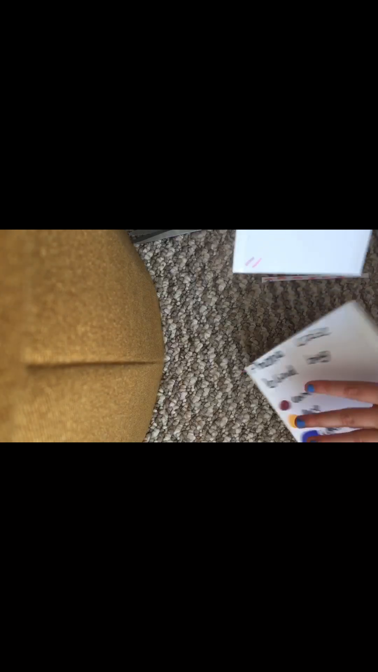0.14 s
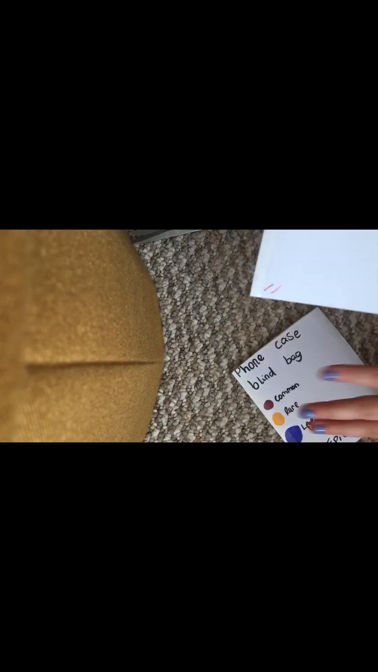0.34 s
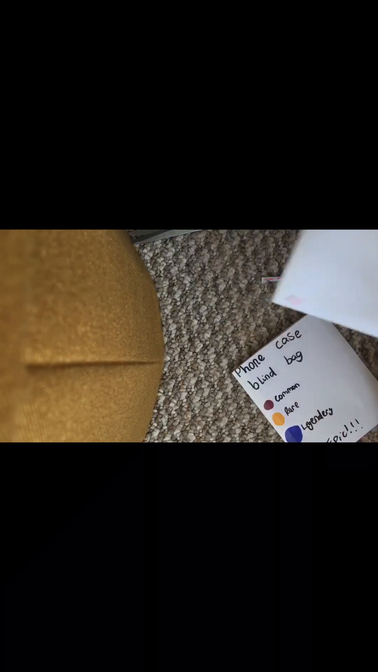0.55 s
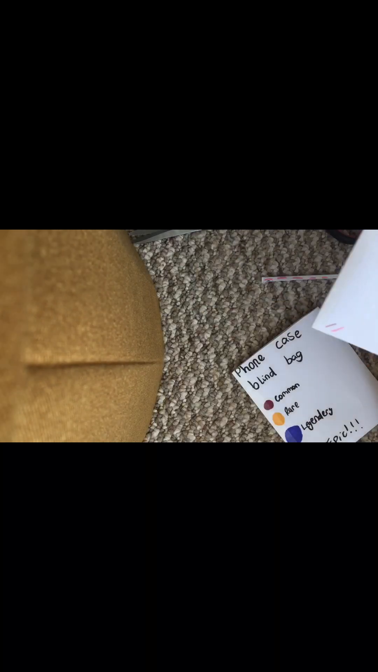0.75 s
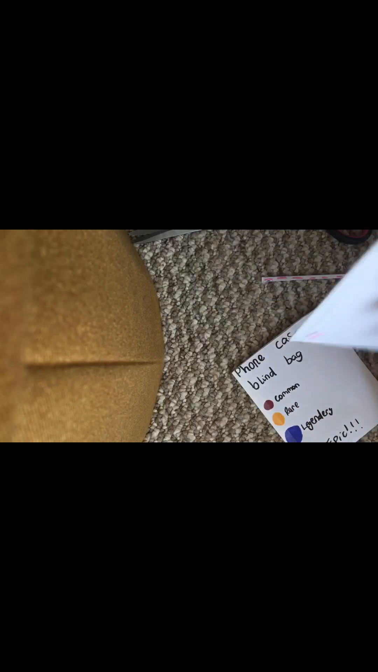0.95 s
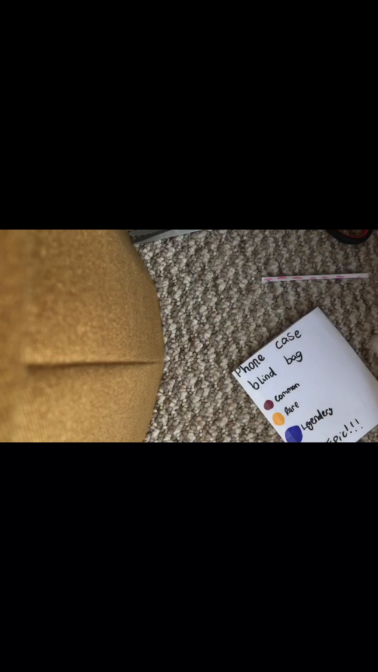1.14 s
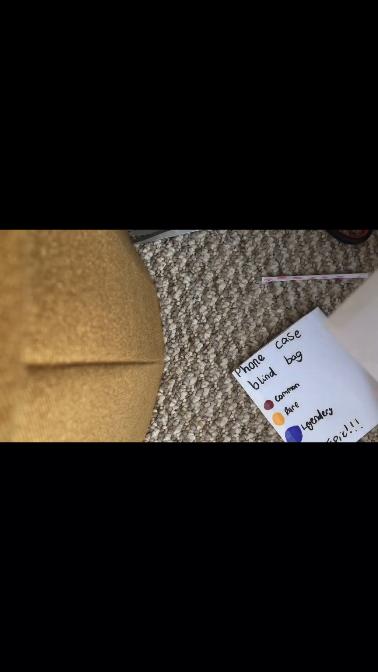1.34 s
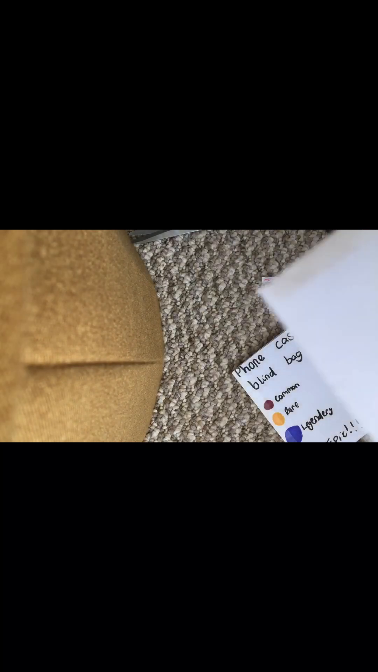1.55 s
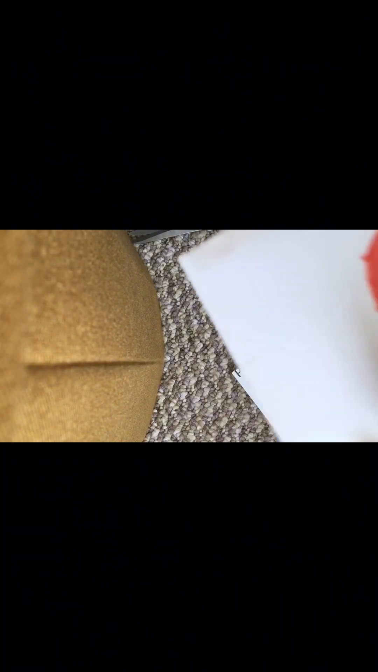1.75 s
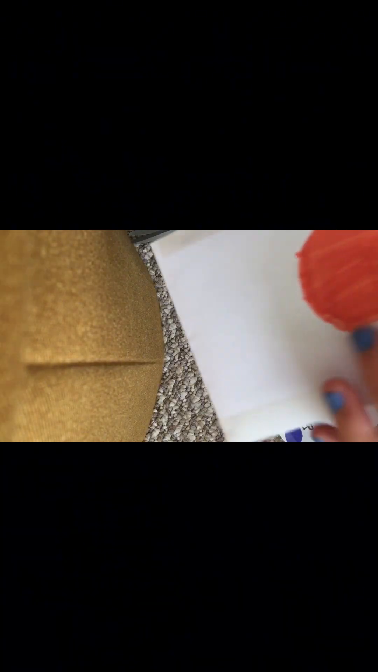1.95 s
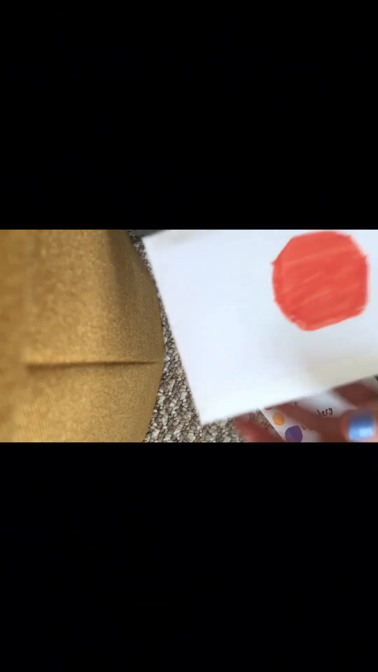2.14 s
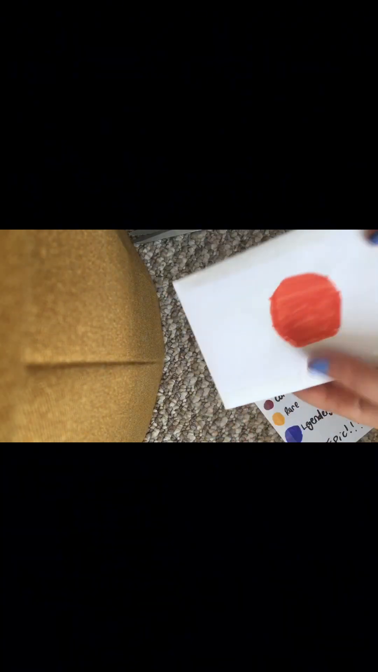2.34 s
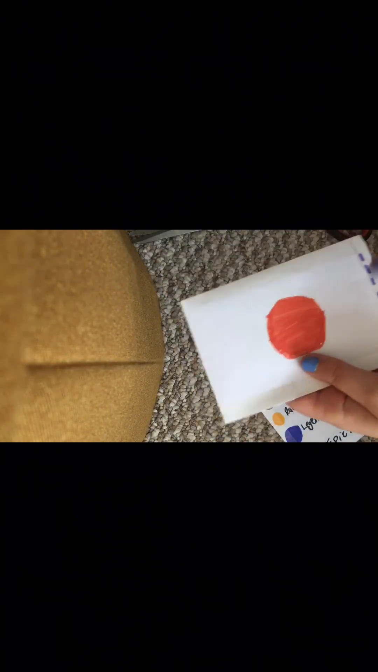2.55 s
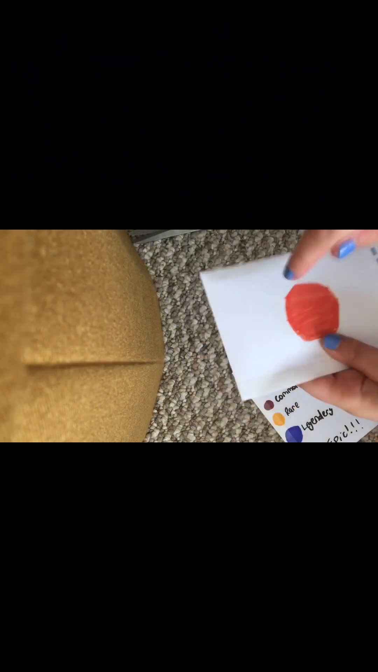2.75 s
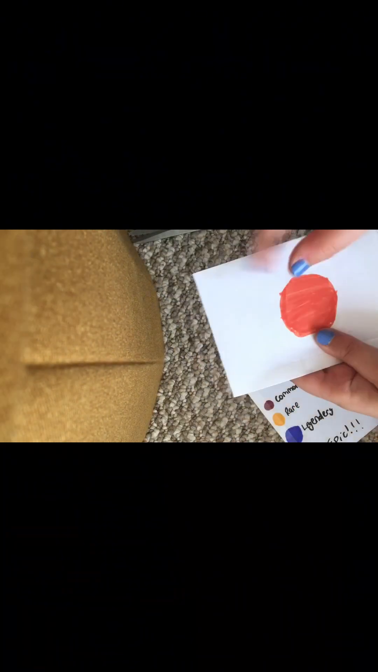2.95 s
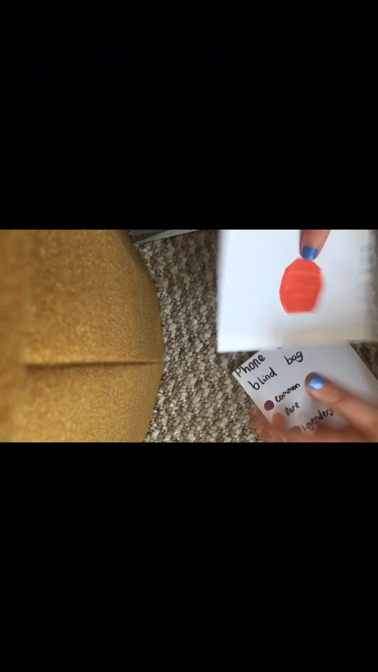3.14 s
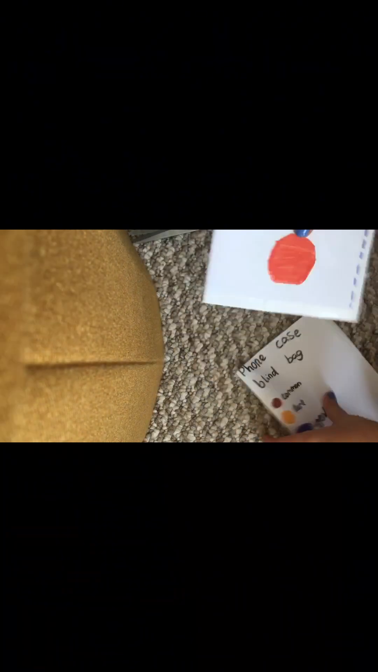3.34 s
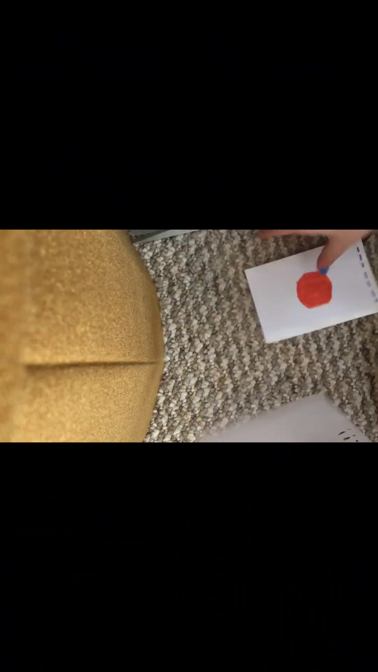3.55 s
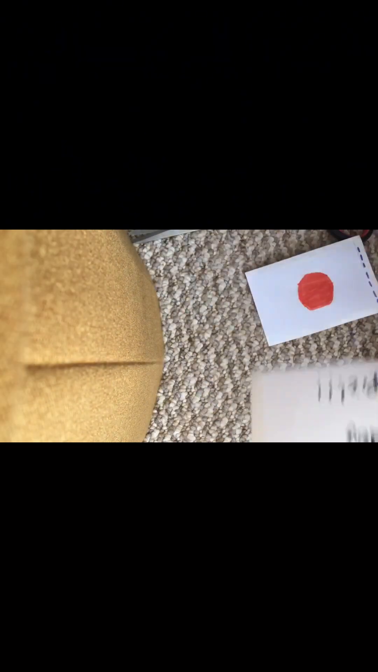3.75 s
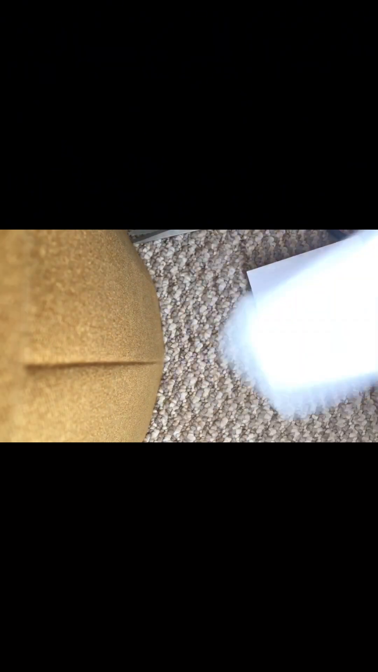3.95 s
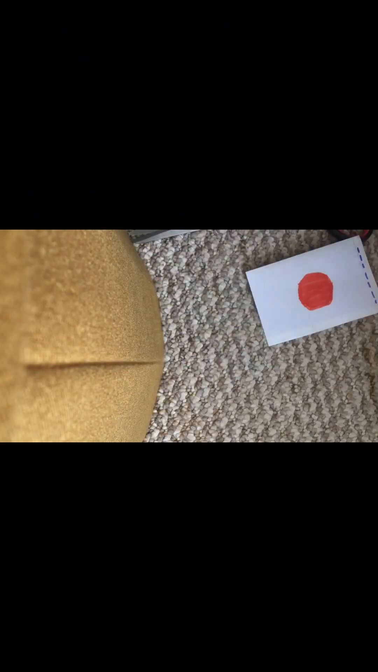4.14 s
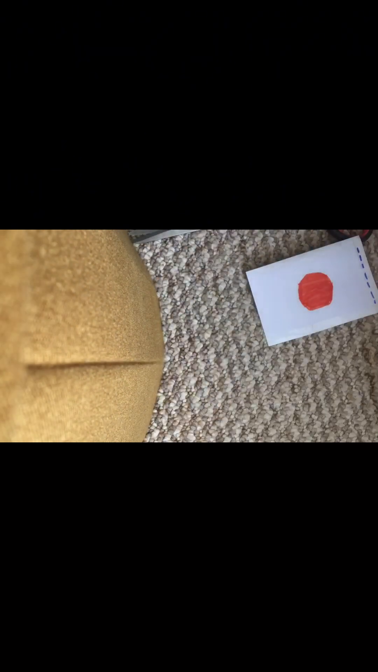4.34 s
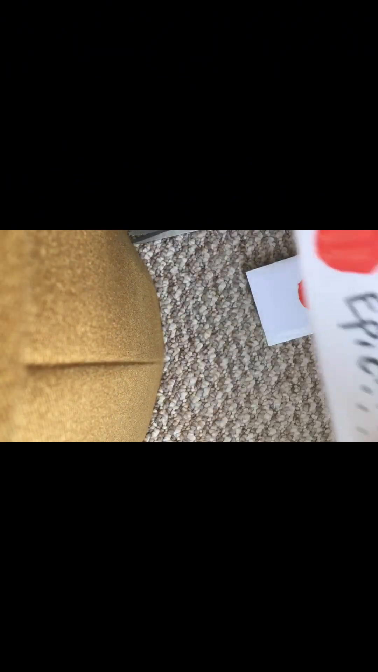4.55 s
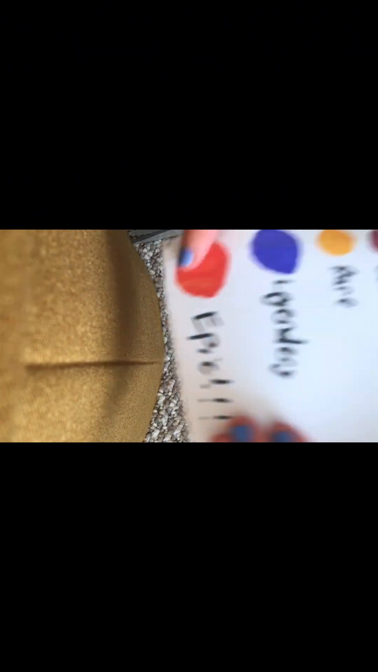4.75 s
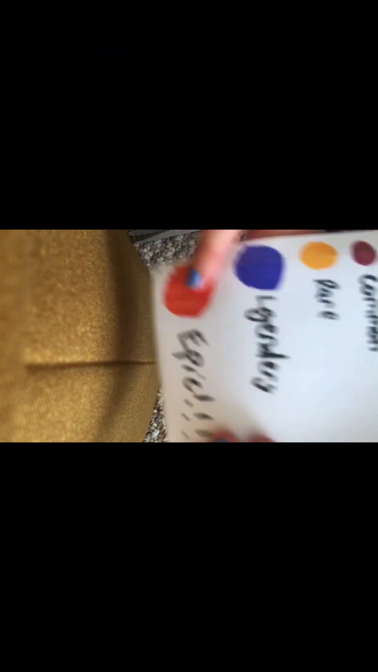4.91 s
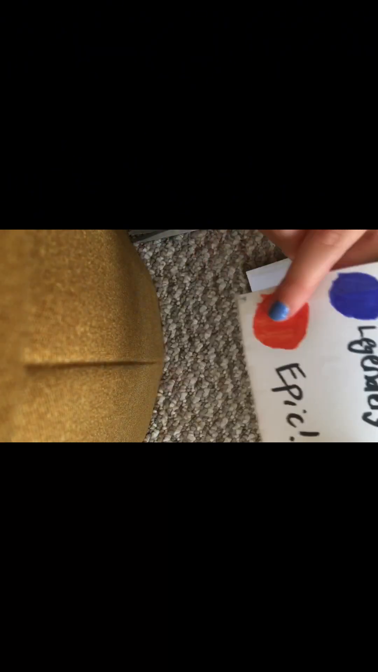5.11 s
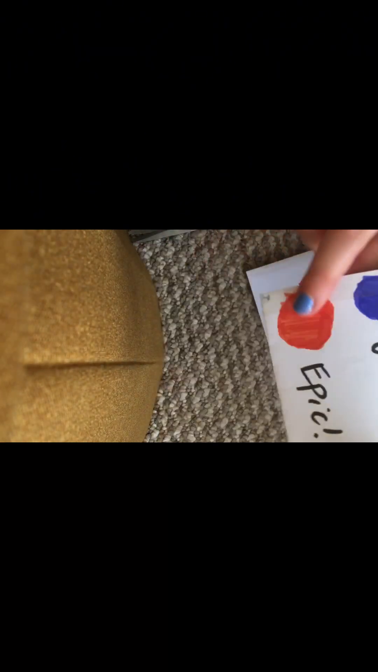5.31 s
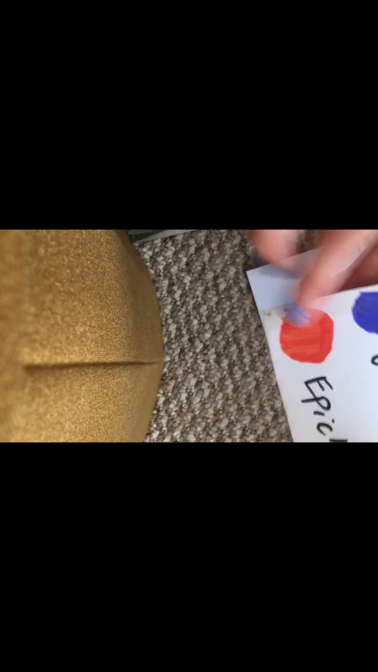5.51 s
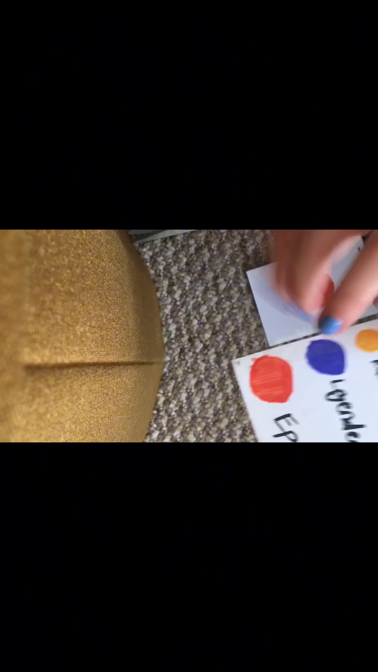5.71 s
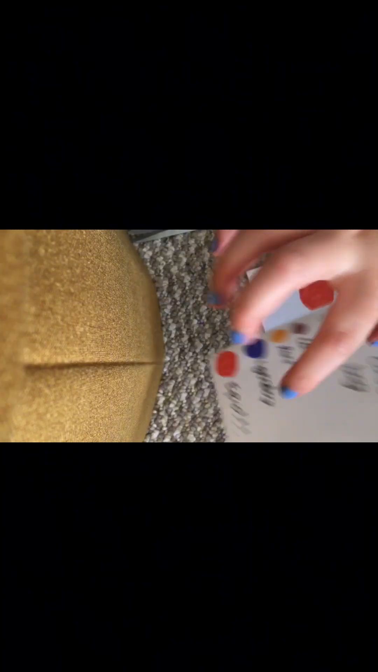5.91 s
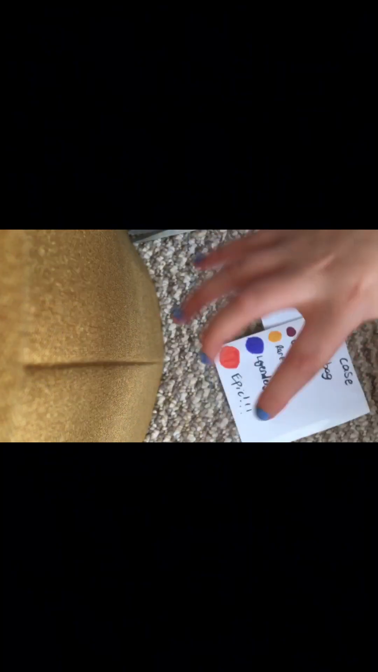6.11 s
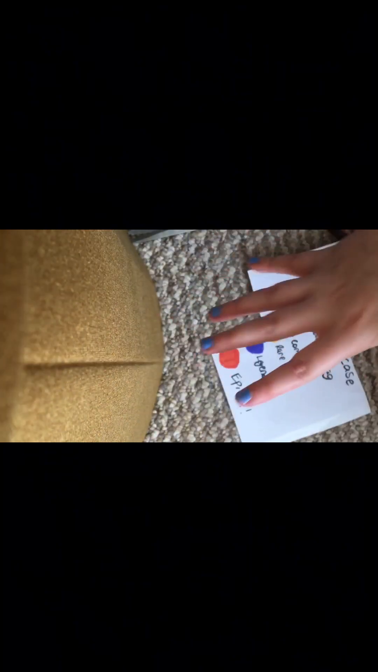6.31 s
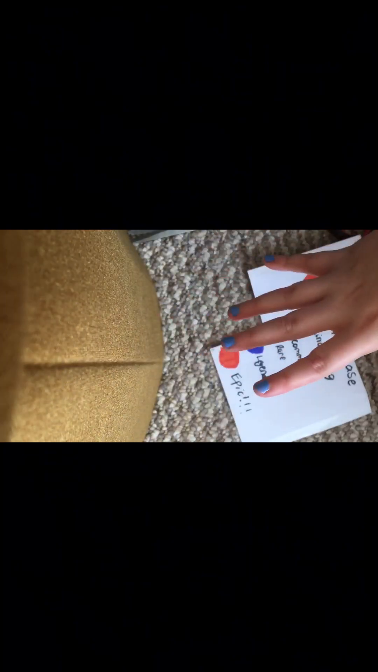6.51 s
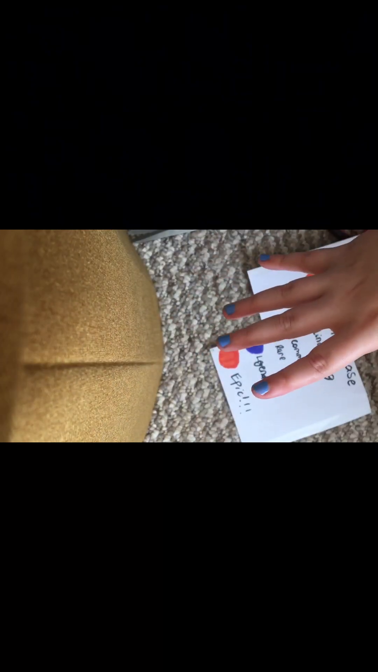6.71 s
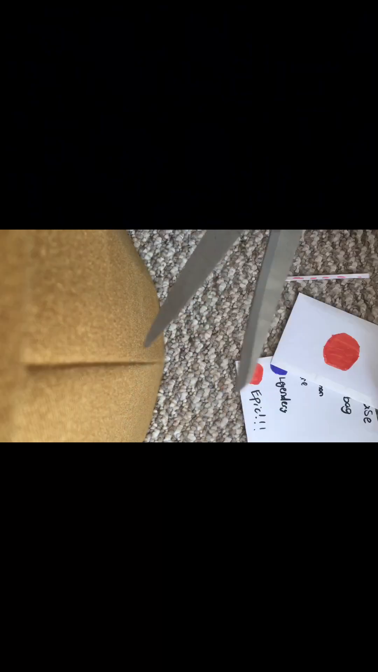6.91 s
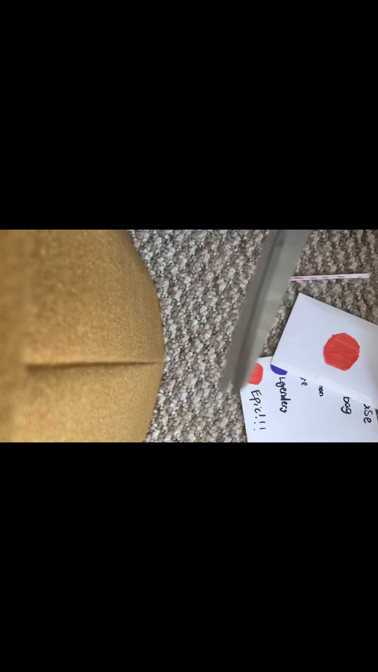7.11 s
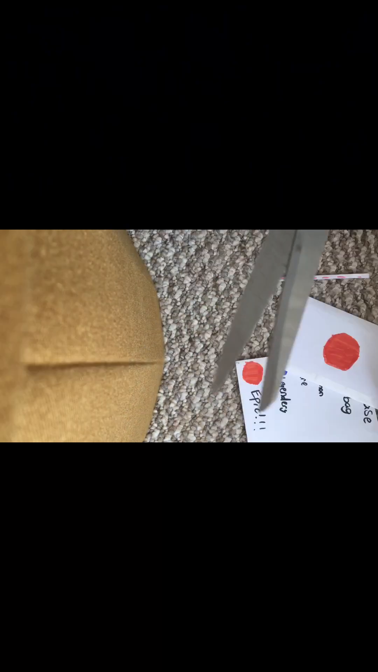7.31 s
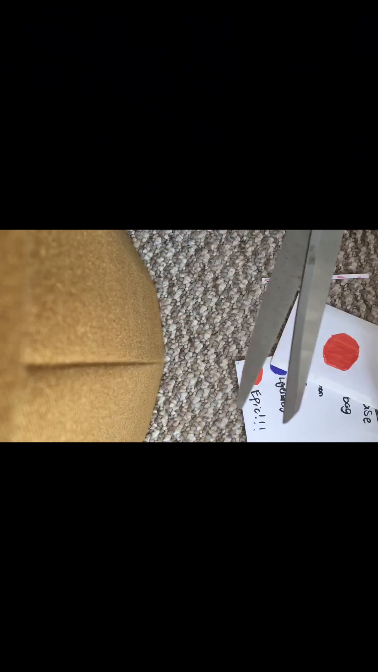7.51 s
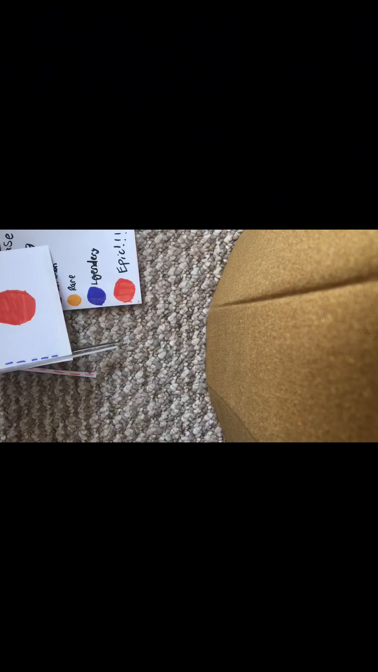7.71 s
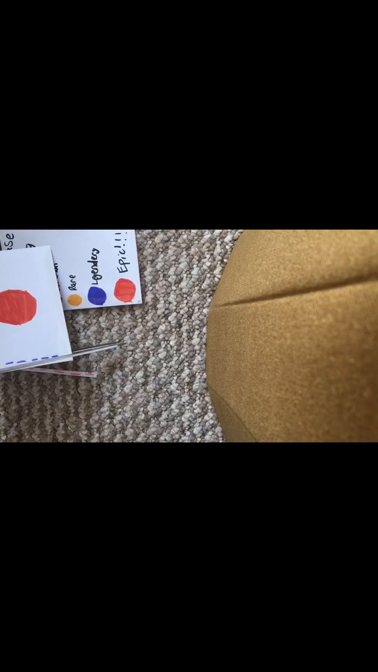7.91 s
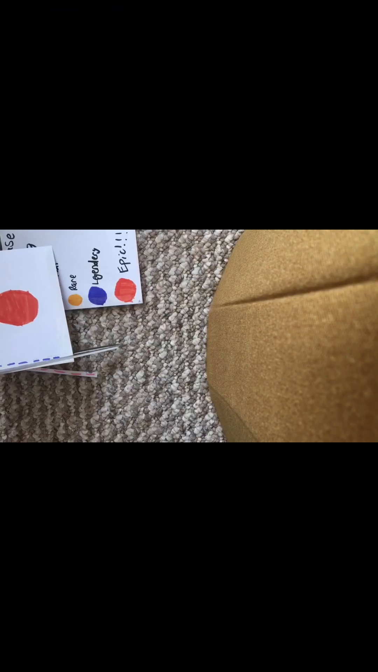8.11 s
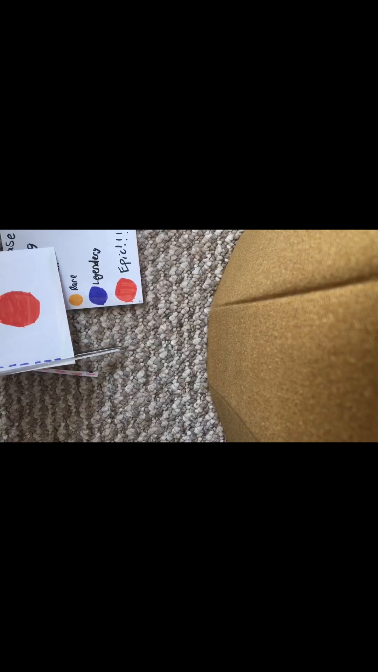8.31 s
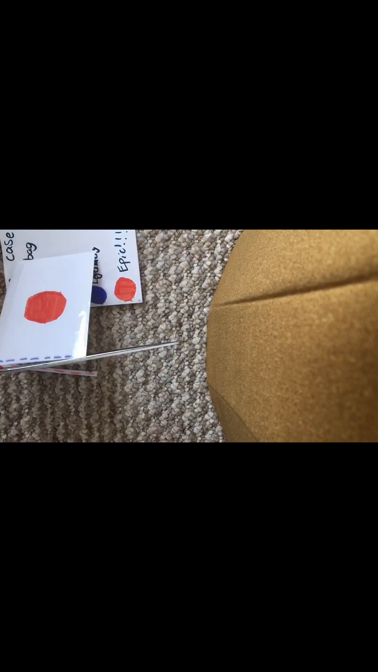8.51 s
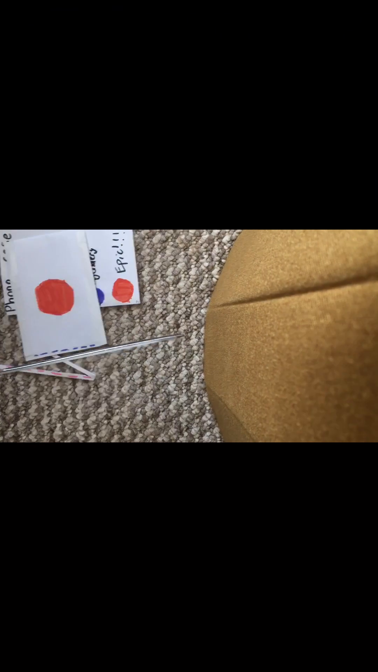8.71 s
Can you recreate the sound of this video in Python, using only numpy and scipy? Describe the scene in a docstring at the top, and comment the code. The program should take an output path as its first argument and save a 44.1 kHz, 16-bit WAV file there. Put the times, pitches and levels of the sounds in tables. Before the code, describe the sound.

Small bags of folded paper are handled close to the microphone in a quiet room with a faint, low motor hum. For the first two and a half seconds there are only light, scattered taps and crinkles. A sharp paper snap comes at about 2.6 seconds, and the handling grows busier, with crackles, short sliding rustles and soft low puffs of air, strongest around 4 seconds. Lighter taps and crinkles continue until about 6 seconds. Around 7 seconds scissors close twice in the air, with brief metallic chatter, a tiny squeal and a click. A short scrape follows near 7.7 seconds, then a few faint ticks and a slight low rumble. At 8.5 seconds the scissors snip through the paper with a sharp clack, the loudest sound, and the cut bag flops softly onto the carpet.

```python
"""A quiet furnished room, close over the carpet: hands turn, tap and slide small bags of folded paper.
Creases snap and ring the hollow of a bag, paper faces hiss and crinkle, swung bags pump the air.
Then scissors work twice in the air and snip through a bag: the blades chatter, squeal and clack, the
room rumbles briefly and the cut bag flops down. A far motor hums behind; a phone microphone hears it."""
import sys
import numpy as np
from scipy import signal
from scipy.fft import rfft, irfft, next_fast_len
from scipy.io import wavfile
from scipy.ndimage import uniform_filter1d, map_coordinates

SR = 44100
rng = np.random.default_rng(int(sys.argv[2]) if len(sys.argv) > 2 else 0)


def generate_wav(sig):
    """Save sig (samples, or channels by samples) to the path in sys.argv[1] as 16-bit PCM at SR."""
    pcm = np.round(np.clip(np.atleast_2d(sig).T, -1, 1) * 32767).astype(np.int16)
    wavfile.write(sys.argv[1], SR, pcm)


N = 390726

# creases buckling and fingertips landing: t/s, sheet peak/dB, crack re sheet/dB, puff re sheet/dB
PAPER_SNAPS = [(0.0524, -45.5, -6.5, -13), (0.0679, -38.5, -19, -28), (0.0923, -58.5, 6.5, -18),
               (0.1889, -27.5, -33, -24), (0.2474, -57, 9, 1), (0.632, -46.5, 5.5, 0),
               (0.6382, -36.5, 4.5, -4.5), (0.6515, -40, -25, -6), (0.6716, -33.5, 3, -9),
               (0.6919, -33, 7, -8.5), (0.7061, -34.5, 1.5, -11), (0.8468, -44, -2.5, -1),
               (0.8683, -44, -19, -2.5), (0.8842, -60, 10, 4), (1.0, -64, -15, 9), (1.045, -67.5, -15, 8),
               (1.261, -52, 1, -1.5), (1.3574, -54.5, -5, -0.5), (1.3968, -53.5, 8, 0.5),
               (1.496, -52.5, -3, -2), (1.545, -67.5, -15, 13), (1.581, -60.5, 8, 0),
               (1.703, -54.5, -4, 5.5), (1.8584, -46.5, -32, 3), (1.922, -60.5, -10, 11.5),
               (1.99, -52, -12, -15), (2.0386, -48, -9, -20), (2.075, -63, -8, 6), (2.302, -56.5, -1, -2),
               (2.331, -57, 6, -2), (2.338, -38.5, -10, -8), (2.3544, -40, -10, -2),
               (2.4257, -49.5, 8.5, 0.5), (2.4691, -39, -21, -10), (2.6059, -10, -6.5, -10),
               (2.6153, -23, -22, -18), (2.6847, -57.5, 22, 5), (2.7933, -28, -10, -2),
               (2.813, -48, -9, -7), (2.826, -46, -2, -11), (2.9949, -30.5, -6.5, -5),
               (3.0316, -36.5, -3.5, -23), (3.0476, -41, -3, -2), (3.0529, -39, 5.5, -5.5),
               (3.0793, -36.5, -5, -7), (3.1052, -48, -10, -15), (3.137, -54, -2, -8),
               (3.199, -45, 3.5, -9), (3.2508, -42.5, -3, -6), (3.2612, -31, -23, -25),
               (3.3056, -32, -4, -24), (3.3336, -26.5, -7, -15), (3.3452, -30, 1.5, -7.5),
               (3.45, -36.5, -14, -15), (3.4654, -36, -18, -7), (3.5062, -33.5, -16, -18),
               (3.522, -37, 0, -4.5), (3.633, -44.5, 1, -11), (3.6786, -48, -3.5, -3),
               (3.7154, -29.5, -1.5, 0), (3.732, -22, -6.5, -14), (3.7766, -44.5, -6, 7.5),
               (3.8403, -35.5, -16, -8), (3.9232, -27, -1, -15), (3.9448, -35, -1, -2),
               (3.9549, -35, -22, -6), (4.0392, -32, -11, 1.5), (4.0782, -19, 2, -16),
               (4.084, -23.5, 1, -10), (4.1838, -40, -11, 3), (4.2257, -19, -9, -6.5), (4.24, -25, -9, -9),
               (4.2481, -27, -7, -0.5), (4.2808, -31.5, -6.5, -7), (4.3043, -27.5, -25, -5),
               (4.325, -43, -30, -2), (4.3427, -53, 5, 9.5), (4.3673, -44, -33, 1),
               (4.3848, -38, -6.5, -2.5), (4.5667, -37, -2.5, -3), (4.5745, -46.5, -2, -9.5),
               (4.6253, -45, -4, -7), (4.673, -37, -32, -5), (4.7146, -45, -3.5, -3),
               (4.7644, -37.5, -8, -5.5), (4.8305, -54, -20, -19), (4.8746, -35, -10, -2),
               (4.8885, -36, 3.5, -8.5), (4.9409, -49, 6.5, 7.5), (5.0492, -36.5, -9.5, -5),
               (5.056, -37, -11, -10), (5.0658, -42, -0.5, 0.5), (5.1058, -42.5, -1.5, -7),
               (5.134, -46, -4, -5), (5.2034, -41.5, -4.5, -4), (5.2906, -43, -11.5, -4.5),
               (5.3059, -41.5, -2.5, -8.5), (5.37, -44.5, -15, -5), (5.4206, -29.5, -27, -4),
               (5.4538, -45, -10, 1), (5.4866, -36, -6.5, -11), (5.6015, -48.5, -5, -13),
               (5.6228, -46.5, 4, -13.5), (5.6628, -63.5, 24.5, 7), (5.724, -35, -4.5, -9),
               (5.7342, -48, 3, -15), (5.7481, -44, -28, -6), (5.768, -46.5, 1.5, -8),
               (5.7929, -52, 6.5, -4), (5.9545, -40.5, 3, -5.5), (5.9752, -41, -24, -15),
               (6.259, -61.5, 9, -9.5)]
# tone of the sheet's body, a crease's bright crack and a bag's puff of air: f/Hz, level/dB
SHEET_EQ = [(300, -25), (600, 2), (900, 0), (1400, -1.5), (2500, -7), (4000, -10), (7000, -26)]
CRACK_EQ = [(2500, -22), (4500, -0.5), (6500, 0), (13000, -6.5), (16800, -14)]
PUFF_EQ = [(60, -25.5), (110, 0.5), (250, 1.5), (520, -6.5), (850, -21.5)]


def snaps():
    """A buckling crease cracks, rings the bag's hollow a little longer and pushes out a puff of air."""
    # pitch of the hollow as the grip opens and closes it: t/s, f/Hz
    hollow_pitch = [(0, 2100), (.3, 2000), (.6, 1450), (2.3, 1250), (2.6, 1600), (3.1, 1300), (3.33, 2200),
                    (3.5, 1300), (3.92, 1800), (4.3, 1150), (4.9, 1500), (6.3, 1200)]
    at, db, crack_db, puff_db = np.transpose(PAPER_SNAPS)[:, :, None]
    detune = np.exp(0.23 * rng.standard_normal(db.shape))
    hollow_hz = np.interp(at, *np.transpose(hollow_pitch)) * detune
    t = np.arange(SR // 20) / SR
    # strong snaps run along more folds, so they last longer
    life = 0.0039 * amp(0.025 * (db + 38.0) + 1.4 * rng.standard_normal(db.shape))
    attack = 1 - np.exp(-t / 0.000075)

    def burst(decay_s, grit_db):
        return gritty((len(at), len(t)), grit_db) * attack * np.exp(-(t / decay_s) ** 1.4)

    hollow = modes([(hollow_hz, 0.83 * hollow_hz, 0), (3.0 * hollow_hz, 0.52 * hollow_hz, -9)])
    crack = filtered(burst(0.43 * life, 3.3), colour(CRACK_EQ))
    sheet = filtered(burst(0.61 * life, 1.6), lambda hz: (hollow(hz) + 0.12) * colour(SHEET_EQ)(hz))
    pocket_hz = 260 * np.exp(0.35 * rng.standard_normal(db.shape))  # each fold traps its own air pocket
    pocket = modes([(pocket_hz, 0.73 * pocket_hz, 0)])
    puff = filtered(burst(1.4 * life, 0.8), lambda hz: (pocket(hz) + 0.2) * colour(PUFF_EQ)(hz))
    snap = peaked(sheet) + amp(crack_db) * peaked(crack) + amp(puff_db) * peaked(puff)
    return placed(at[:, 0], amp(db) * snap)


def rubbing():
    """Fibres hiss in each rub and around each snap; the sheets crinkle in clumps, pop and puff."""
    # paper rubs; the last row is a faint rise in background hiss with ticks:
    # start/s, end/s, hiss/dB, crinkle/dB, swell/dB
    rubs = [(0.043, 0.104, -79, -71, -4), (0.173, 0.26, -79, -66.5, -8), (0.33, 0.396, -76.5, -88, -3),
            (0.631, 0.71, -83, -67, 4), (0.712, 0.75, -64, -67, 2), (0.75, 0.826, -71.5, -78.5, 0),
            (0.829, 0.9, -75, -76, -12), (0.934, 0.998, -71.5, -86, -3), (1.12, 1.184, -72, -72.5, 3.5),
            (1.223, 1.276, -74.5, -70, -3), (1.334, 1.446, -71.5, -73, -4.5), (1.5, 1.58, -73, -78.5, 0),
            (1.913, 1.98, -65, -67, 2.5), (1.982, 2.07, -68, -64, -6), (2.303, 2.439, -71, -64.5, 4.5),
            (2.443, 2.472, -62.5, -65.5, 1), (2.585, 2.598, -82, -67, 3), (2.604, 2.624, -48.5, -40, -2.5),
            (2.626, 2.68, -60, -61, -4), (2.828, 2.871, -61.5, -66, 2), (2.96, 3.098, -59, -57.5, 6.5),
            (3.191, 3.257, -69.5, -65, 2), (3.255, 3.323, -55, -48, 0.5), (3.33, 3.359, -52, -45, 4.5),
            (3.355, 3.535, -61.5, -56.5, -1), (3.537, 3.6, -66, -65.5, -2.5), (3.6, 3.651, -52.5, -58, 0.5),
            (3.647, 3.714, -71, -66, 0), (3.717, 3.756, -53, -41, -1), (3.758, 3.827, -64.5, -58.5, 2),
            (3.83, 3.931, -47.5, -50, 10), (3.932, 3.965, -58, -49.5, 1.5), (3.967, 4.02, -75, -60.5, 5),
            (4.022, 4.091, -40, -35, 17.5), (4.095, 4.164, -73.5, -72, -15), (4.172, 4.226, -62.5, -64, -6),
            (4.229, 4.4, -89.5, -68.5, -22.5), (4.762, 4.815, -71.5, -68, 5), (4.88, 4.956, -87, -71.5, 0),
            (5.364, 5.496, -90, -70.5, 2), (5.601, 5.803, -77.5, -70, 4), (6.016, 6.056, -61, -62.5, -3),
            (7.68, 8.2, -84.5, -86.5, 0.5)]
    # tone of the hiss: f/Hz, level/dB
    hiss_eq = [(3000, -25), (4500, -5.5), (6500, -1), (11000, -4), (16800, -12)]
    hiss_gain, crinkle_gain = stroke_gains(rubs, edge_s=0.0067)
    at, db, crack_db, _ = np.transpose(PAPER_SNAPS)[:, :, None]
    lead = SR // 60
    t = np.arange(-lead, 3 * lead) / SR
    rustle = np.where(t < 0, np.exp(t / 0.002), np.exp(-(t / 0.013) ** 2))  # build-up, then tail
    starts = at[:, 0] - lead / SR
    hiss_gain += placed(starts, amp(db + crack_db - 34) * rustle)
    crinkle_gain += placed(starts, amp(db - 26) * rustle)

    def grain(grit_db, eq, depth_db):
        slips = unit(gritty(N, grit_db))
        creases = amp(-7) * pops(count=600)
        return patchy(filtered(slips + creases, colour(eq)), depth_db)

    clumps = wobble(60)
    fibres = amp(1.7 * clumps + 0.78 * wobble(230)) * grain(3.9, hiss_eq, depth_db=2.5)
    folds = amp(1.7 * clumps + 2.4 * wobble(150)) * grain(5.0, SHEET_EQ, depth_db=5)
    puffs = amp(-4 + 2.2 * wobble(25)) * unit(filtered(rng.standard_normal(N), colour(PUFF_EQ)))
    return hiss_gain * unit(fibres) + crinkle_gain * (unit(folds) + puffs)


def scissors():
    """Edges chatter along each other and ring the blades, scrape, clack and squeal."""
    # blade strokes: start/s, end/s, chatter/dB, scrape/dB, swell/dB
    blade_strokes = [(6.826, 6.866, -60, -65.5, 9.5), (6.937, 6.959, -49.5, -57, 10.5),
                     (6.962, 6.992, -33, -46.5, 18.5), (7.155, 7.173, -43.5, -56.5, 16.5),
                     (7.178, 7.187, -57, -54, 6.5), (7.657, 7.671, -58, -37, 8),
                     (8.424, 8.486, -90, -64.5, 2), (8.486, 8.499, -61.5, -40.5, 15.5),
                     (8.5, 8.509, -33, -39.5, 0.5), (8.51, 8.624, -79.5, -60.5, -11.5),
                     (8.639, 8.72, -77, -64.5, -5.5)]
    # resonances of the steel: f/Hz, width/Hz, level/dB
    blade_modes = [(2160, 280, -16), (3670, 160, -11), (4300, 300, -19), (5820, 300, -17), (8300, 180, -12),
                   (9600, 420, -8), (11200, 250, -4), (13900, 400, -6), (14530, 270, -0.5),
                   (14370, 540, -7)]
    chatter_gain, scrape_gain = stroke_gains(blade_strokes, edge_s=0.0037)
    chatter = chatter_gain * unit(amp(4.5 * wobble(600)) * gritty(N, 6.5))
    ring = modes(blade_modes)
    steel = filtered(chatter, ring) / np.std(filtered(rng.standard_normal(SR), ring))
    return steel + shearing(scrape_gain) + clacks(ring) + squeals()


def shearing(gain):
    """Closing edges scrape along each other: a broad, grainy rasp."""
    # tone of the rasp: f/Hz, level/dB
    shear_eq = [(240, -18), (400, -16.5), (1030, -1.5), (2290, -4), (2930, -9.5), (6390, -5),
                (14800, -14.5), (16500, -21)]
    flutter = amp(1.2 * wobble(360))
    rasp = patchy(filtered(gritty(N, 3), colour(shear_eq)), depth_db=4.0)
    return gain * flutter * unit(rasp)


def clacks(blade_ring):
    """Tips and handles meet: each blow blends ringing steel with a dull knock."""
    # blows: t/s, level/dB, dull share from 0 to 1
    hits = [(6.8265, -52.5, .2), (6.9927, -30.5, 0.7), (7.186, -31, 0), (7.6635, -55.5, 0.7),
            (7.85, -55, 0.43), (8.018, -54, 0.68), (8.426, -58.5, .7), (8.4965, -17.5, 0.55),
            (8.5071, -5, 0.58), (8.508, -11.5, 0.37), (8.6399, -59.5, 0.6)]
    at, db, dull = np.transpose(hits)[:, :, None]
    t = np.arange(SR // 20) / SR
    blow = rng.standard_normal((len(at), len(t))) * np.exp(-t / 0.0014)
    handles = peaked(filtered(blow, modes([(1782, 370, -3.0), (4150, 1000, 5.5), (5560, 1500, 7.5)])))
    tips = peaked(filtered(blow, blade_ring))
    return placed(at[:, 0], amp(db) * ((1 - dull) * tips + dull * handles))


def squeals():
    """The blades squeal as their crossing point runs along them."""
    # gliding chirps: t/s, length/s, start f/Hz, end f/Hz, level/dB
    chirps = [(6.974, 0.0091, 7600, 10970, -36), (6.982, 0.007, 11800, 12090, -27.5),
              (6.983, .006, 13600, 14820, -30), (7.165, 0.014, 13800, 12400, -38),
              (7.181, 0.0132, 9800, 8000, -50), (8.502, .006, 7800, 9810, -21.5)]
    at, length, start_hz, end_hz, db = np.transpose(chirps)[:, :, None]
    t = np.arange(SR // 20) / SR
    progress = np.clip(t / length, 0, 1)
    pitch = start_hz + (end_hz - start_hz) * progress
    tone = np.sin(2 * np.pi * np.cumsum(pitch, axis=1) / SR)
    flutter = amp(4 * unit(uniform_filter1d(rng.standard_normal(progress.shape), size=12)))
    return placed(at[:, 0], amp(db) * np.sin(np.pi * progress) * flutter * tone)


def drops():
    """The cut bag flops onto the carpet with only a soft puff of air."""
    # landings: t/s, peak/dB
    flops = [(8.506, -45.5), (8.662, -39.5), (8.685, -47)]
    at, db = np.transpose(flops)[:, :, None]
    t = np.arange(SR // 10) / SR
    push = rng.standard_normal((len(at), len(t))) * t * np.exp(-t / 0.004)
    return placed(at[:, 0], amp(db) * peaked(filtered(push, colour(PUFF_EQ))))


def low_swells():
    """Low swells of air: bags swung nearby, then room rumble during the scissors."""
    # middle t/s, half length/s, level/dB
    swells = [(0.681, 0.094, -57), (1.816, 0.09, -52.5), (2.37, 0.048, -51), (2.617, 0.044, -50),
              (2.998, 0.046, -52), (3.077, .066, -52.5), (3.743, 0.076, -42.5), (3.958, 0.04, -46),
              (4.056, 0.044, -39), (4.245, 0.046, -38.5), (4.409, 0.14, -55.5), (4.714, 0.077, -53),
              (4.781, 0.047, -52), (4.895, 0.0397, -46.5), (4.97, .065, -55.5), (5.075, 0.063, -52.5),
              (5.255, 0.13, -57), (8.109, .04, -59.5), (8.248, 0.042, -56), (8.539, 0.14, -58.5)]
    # tone of the swells: f/Hz, level/dB
    air_eq = [(40, -31), (65, 6.5), (110, -5.5), (150, -11), (250, -31)]
    at, half_length, db = np.transpose(swells)[:, :, None]
    t = np.arange(SR // 3) / SR
    air = filtered(rng.standard_normal((len(at), 2 * len(t))), colour(air_eq))[:, len(t):]
    swell = air * np.sin(np.pi * np.clip(t / (2 * half_length), 0, 1)) ** 2.1
    size = np.sqrt((swell ** 2).sum(axis=1, keepdims=True) / (half_length * SR))
    return placed((at - half_length)[:, 0], amp(db) * swell / size)


def ticks():
    """Folded paper settles with faint scattered ticks."""
    return amp(-91.5) * filtered(pops(count=150), colour(CRACK_EQ))


def walls(x):
    """A short room reverb, with a fresh tail every quarter second as moving hands change the paths."""
    # time the room takes to die by 60 dB: f/Hz, decay/s
    decay_times = [(150, 0.11), (3000, 0.16), (15000, 0.06)]
    reverb, step = np.zeros(N + SR), SR // 4
    predelay = 200  # samples
    for i in range(0, N, step):
        hz, t, bands = signal.stft(rng.standard_normal(SR // 3), SR, nperseg=256)
        decay = amp(-60 * t / along(decay_times, hz)[:, None])
        tail = signal.istft(bands * decay, SR, nperseg=256)[1]
        wet = signal.fftconvolve(x[i:i + step], tail / np.linalg.norm(tail))
        reverb[i + predelay:][:len(wet)] += wet
    return reverb[:N]


def room_tone():
    """A bed of air and microphone hiss over the wavering drone of a far motor."""
    # tone of the bed: f/Hz, level/dB
    bed_eq = [(40, -21), (60, -0.5), (100, -6.5), (190, -14.5), (400, -20), (830, -27), (1400, -29.5),
              (9000, -37.5), (16800, -43.5)]
    # motor hum: multiple of the turning speed, level/dB
    harmonics = [(2, -62.5), (3, -67), (4, -71)]
    bed_gain = amp(-68.5 + 0.94 * wobble(2))
    bed = unit(filtered(rng.standard_normal(N), lambda hz: amp(along(bed_eq, hz, -90))))
    motor_hz = 21.4 + 0.56 * wobble(3.5)
    turn = 2 * np.pi * np.cumsum(motor_hz) / SR
    drone = sum(amp(db + 2.5 * wobble(5)) * np.sin(k * turn + 0.6 * wobble(3)) for k, db in harmonics)
    return bed_gain * bed + drone


def amp(db):
    """Decibels to gain."""
    return 10 ** (np.asarray(db) / 20)


def unit(x):
    """Scaled to rms 1."""
    return x / np.sqrt(np.mean(x ** 2) + 1e-20)


def peaked(rows):
    """Every row scaled to peak 1."""
    return rows / np.abs(rows).max(axis=-1, keepdims=True)


def along(points, hz, beyond=None):
    """(f/Hz, value) points read on a log frequency axis."""
    f, values = np.transpose(points)
    return np.interp(np.log(hz + 1), np.log(f + 1), values, beyond, beyond)


def wobble(rate):
    """A smooth random curve, rate knots a second."""
    knots = rng.standard_normal(int(N * rate / SR) + 4)
    at = np.arange(0, N + 8, 8)
    return np.interp(np.arange(N), at, map_coordinates(knots, [at * rate / SR]))


def filtered(x, response):
    """x through a complex frequency response."""
    size = 2 * next_fast_len(x.shape[-1] // 2 + 2048)
    return irfft(rfft(x, size) * response(np.fft.rfftfreq(size, 1 / SR)), size)[..., :x.shape[-1]]


def colour(points):
    """A minimum-phase EQ through (f/Hz, level/dB) points."""
    def response(hz):
        cepstrum = irfft(np.log(amp(along(points, hz, -90))))
        cepstrum[1:len(hz) - 1] *= 2
        cepstrum[len(hz):] = 0
        return np.exp(rfft(cepstrum))
    return response


def modes(table):
    """A bank of (f/Hz, width/Hz, level/dB) resonators of alternating polarity."""
    return lambda f: sum((-1) ** k * amp(db) * 1j * f * width / (centre ** 2 - f * f + 1j * f * width)
                         for k, (centre, width, db) in enumerate(table))


def gritty(shape, grit_db):
    """Noise whose samples differ widely in size, like many tiny fibre slips."""
    return rng.standard_normal(shape) * amp(grit_db * np.minimum(rng.exponential(size=shape), 4))


def pops(count):
    """Sparse one-millisecond pops of very unequal size, at random times."""
    return unit(placed(rng.random(count) * N / SR, gritty((count, 1), 3.5) * gritty((count, 50), 1.3)))


def patchy(x, depth_db):
    """Random patches of gain over time and frequency."""
    bands = signal.stft(x, nperseg=256)[2]
    patches = uniform_filter1d(rng.standard_normal(bands.shape), size=6, axis=0)
    patches = uniform_filter1d(patches, size=6, axis=1)
    return signal.istft(bands * amp(depth_db * unit(patches)), nperseg=256)[1][:N]


def stroke_gains(rows, edge_s):
    """Two envelopes: each stroke ramps by its swell in dB to its end levels, with soft edges."""
    gains = np.zeros((2, N))
    for start, end, *db, swell_db in rows:
        a, b = round(start * SR), round(end * SR)
        gains[:, a:b] += amp(np.array(db)[:, None] - swell_db * np.linspace(1, 0, b - a))
    return np.abs(uniform_filter1d(gains, size=round(edge_s * SR)))


def placed(times, rows):
    """Short sounds added up at their times."""
    at = np.round(np.asarray(times) * SR).astype(int)[:, None] + np.arange(rows.shape[1])
    return np.bincount(at.ravel(), rows.ravel(), N + rows.shape[1])[:N]


def scene():
    """Paper and scissors up close, with a touch of reverb, over the room tone."""
    near = snaps() + rubbing() + scissors() + drops() + ticks()
    return (near + amp(-21) * walls(near) + low_swells() + room_tone())[None]


def record(dry):
    """The microphone port colours the treble, drops the deepest bass and stops at its band limit."""
    # f/Hz, level/dB
    mic_eq = [(15, -29.0), (35, -1.0), (3500, -0.5), (4900, -1), (6400, 0.5), (9300, 0), (10500, -1.5),
              (12000, 2.0), (15600, -0.5), (16100, -22), (20000, -26.5)]
    top_hz = 16700
    return filtered(dry, lambda hz: amp(along(mic_eq, hz)) * (hz < top_hz))


dry = scene()
out = record(dry)
generate_wav(out)
```